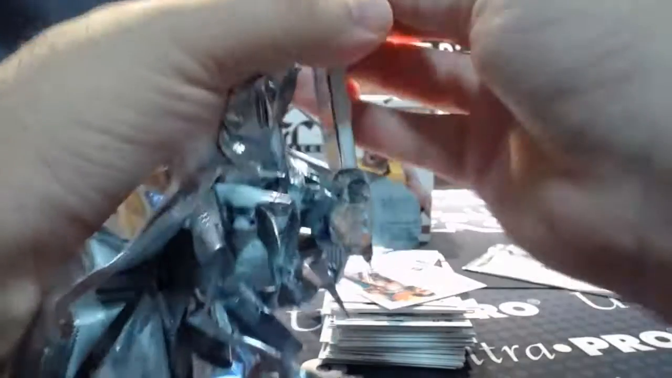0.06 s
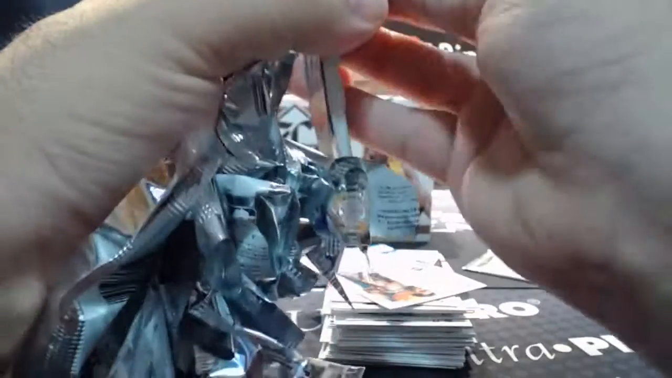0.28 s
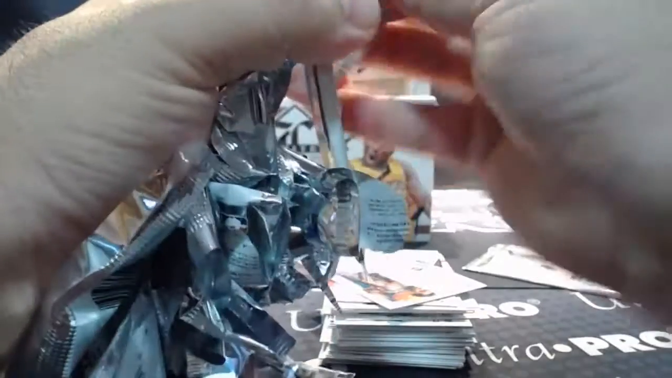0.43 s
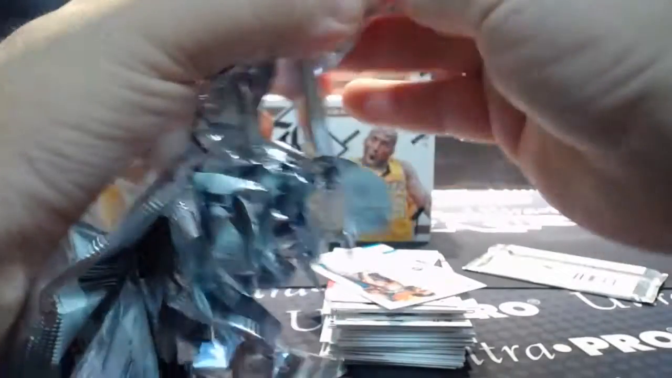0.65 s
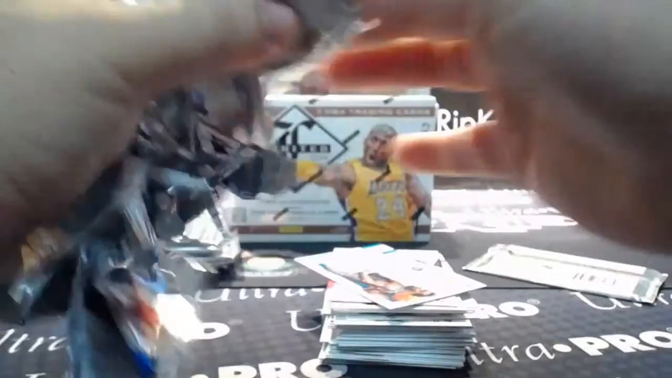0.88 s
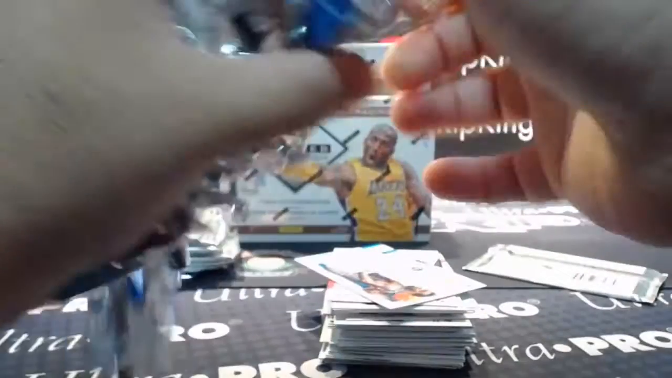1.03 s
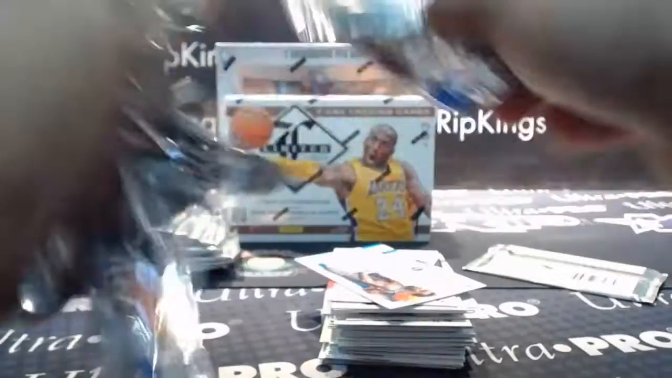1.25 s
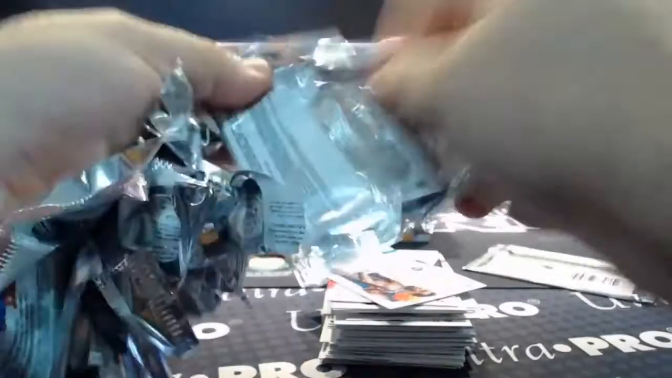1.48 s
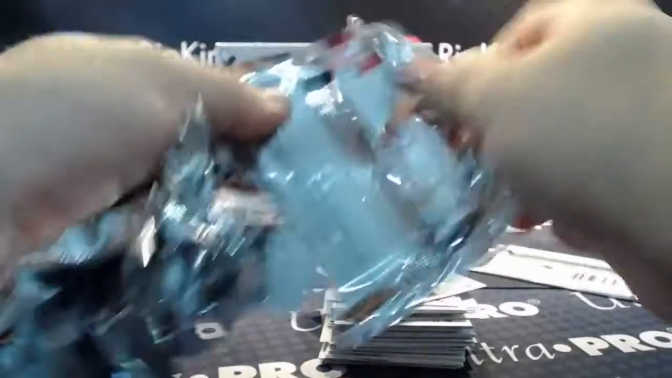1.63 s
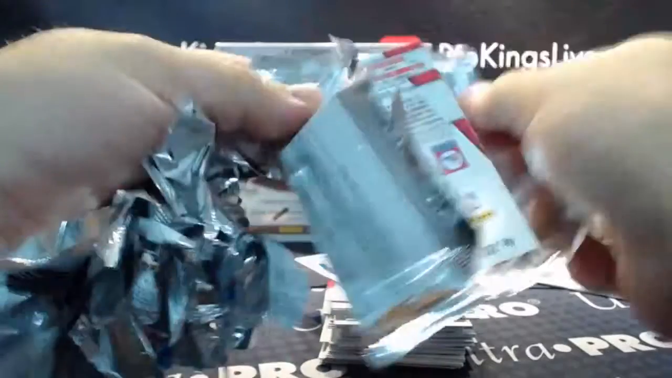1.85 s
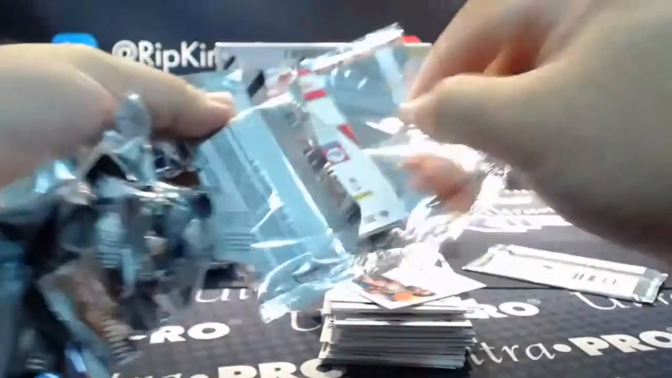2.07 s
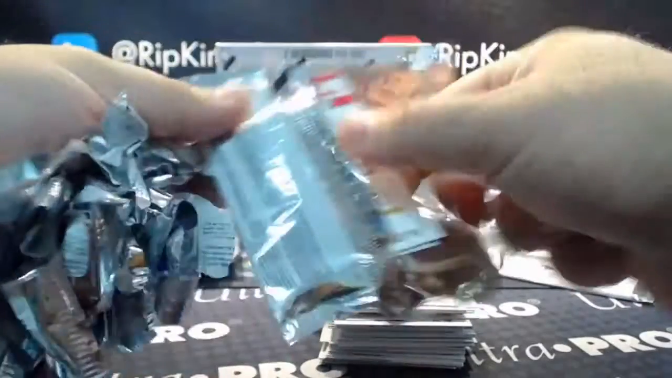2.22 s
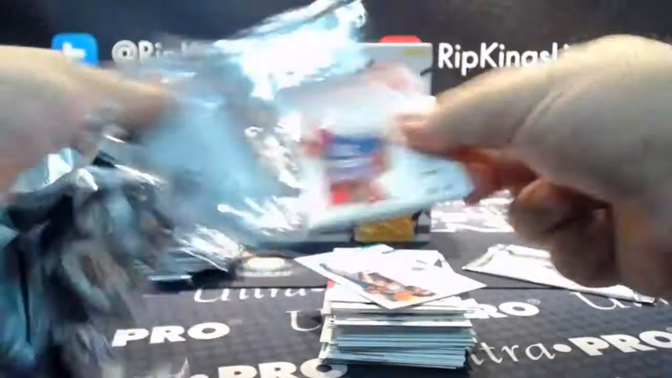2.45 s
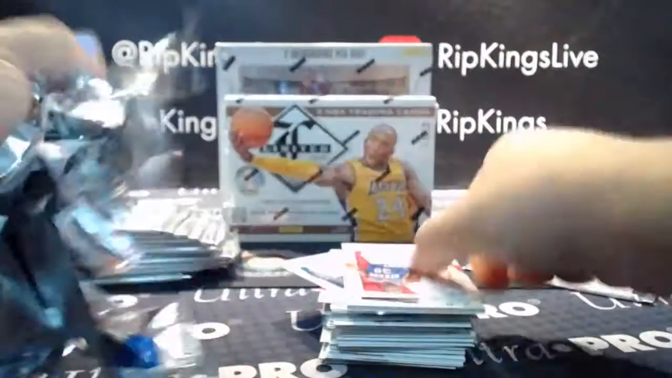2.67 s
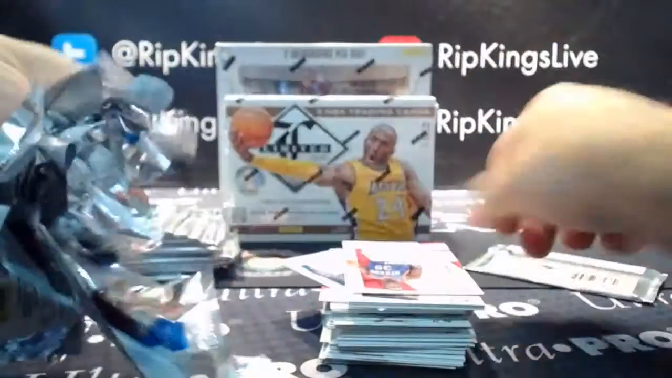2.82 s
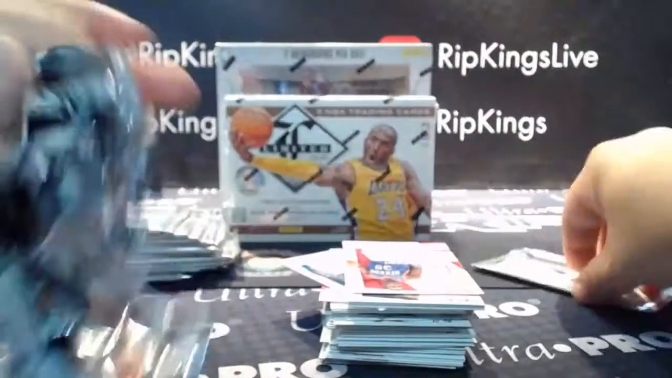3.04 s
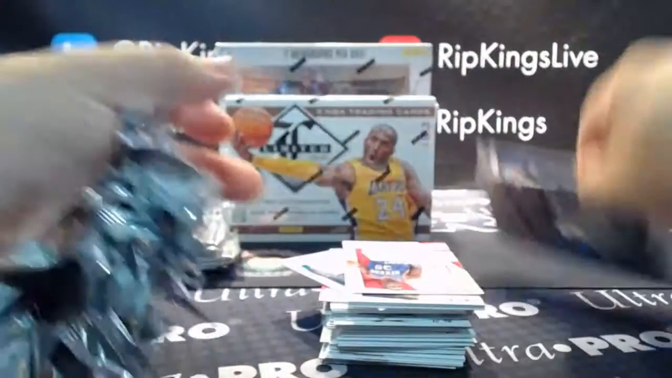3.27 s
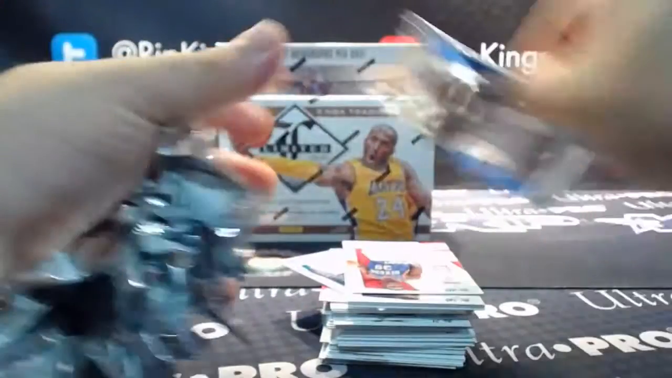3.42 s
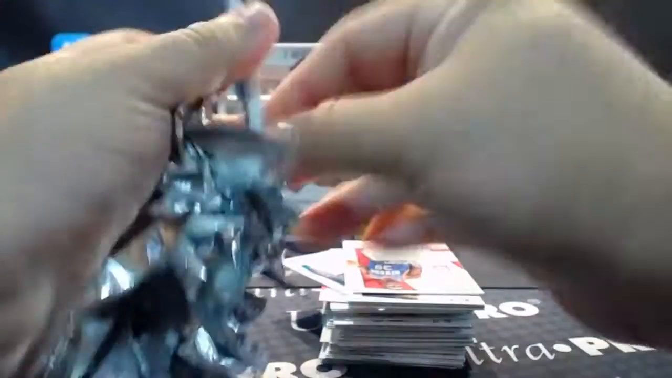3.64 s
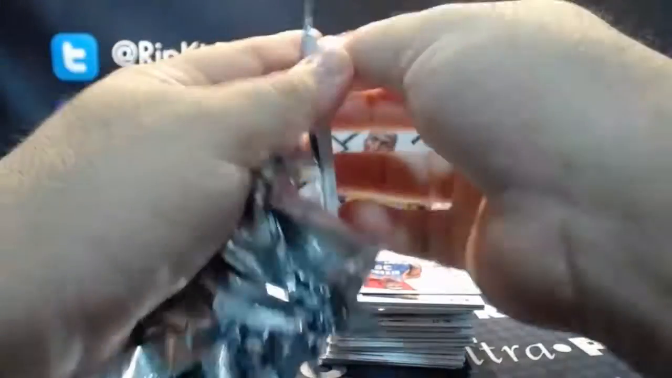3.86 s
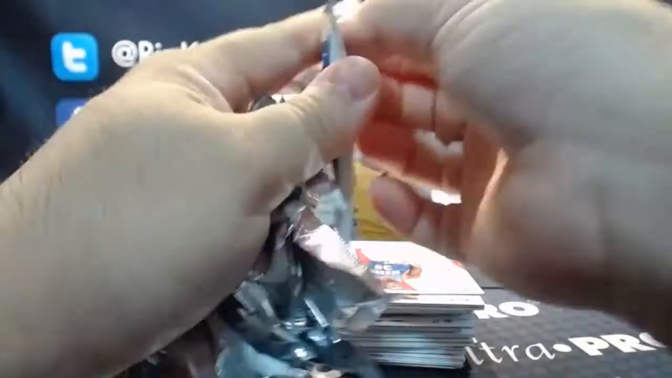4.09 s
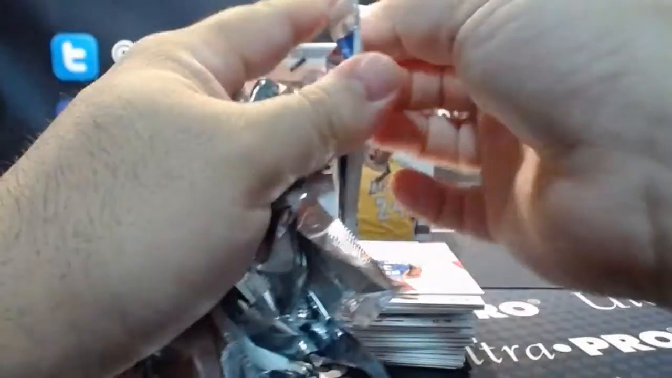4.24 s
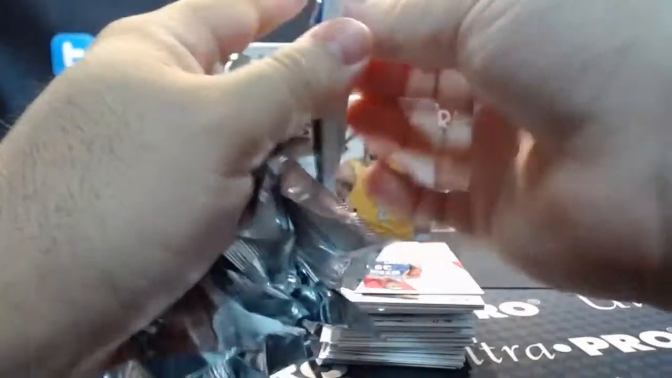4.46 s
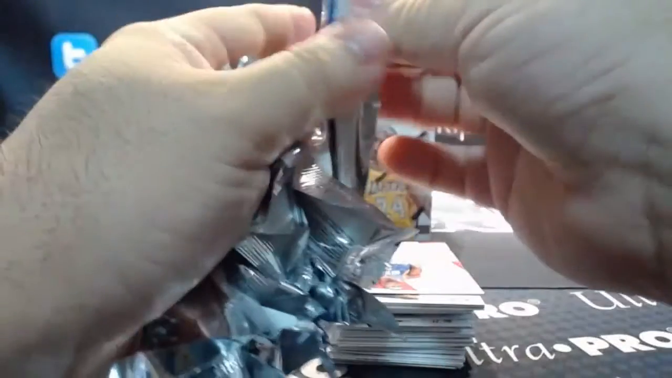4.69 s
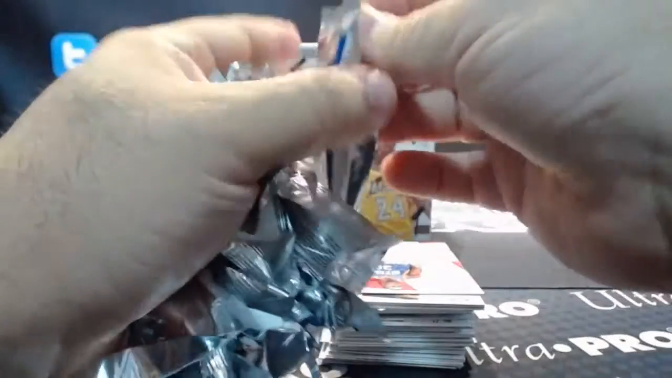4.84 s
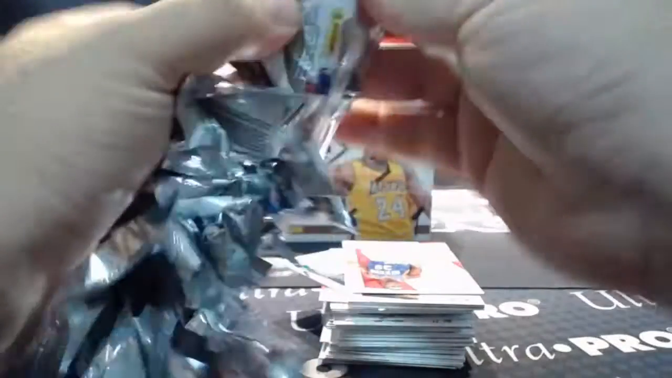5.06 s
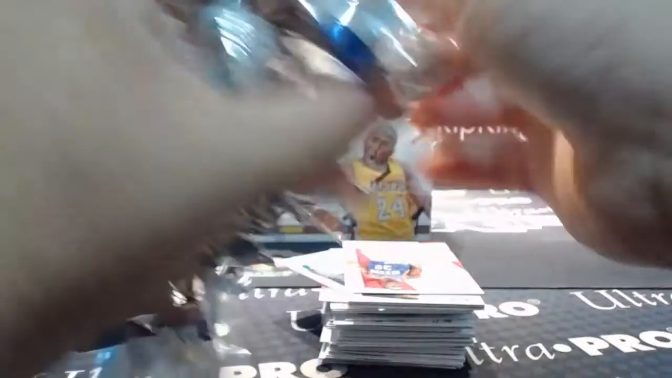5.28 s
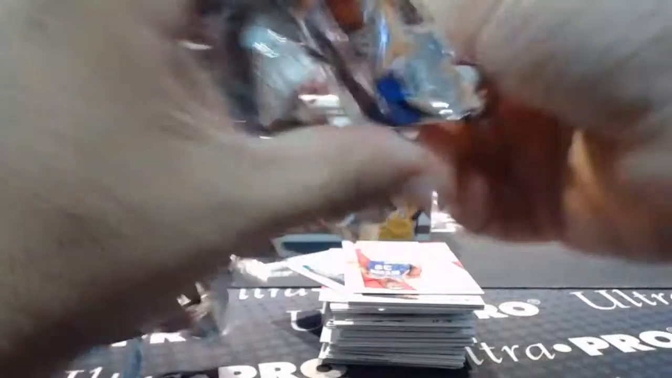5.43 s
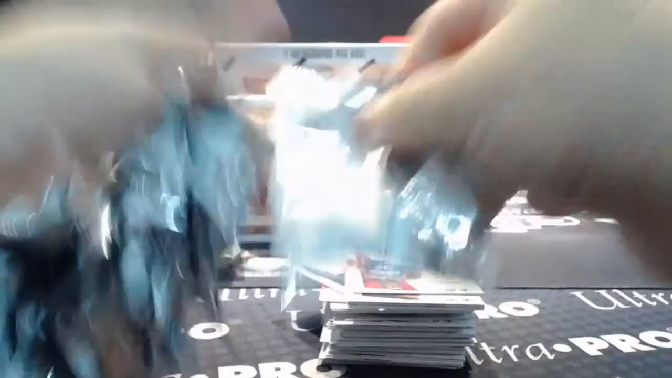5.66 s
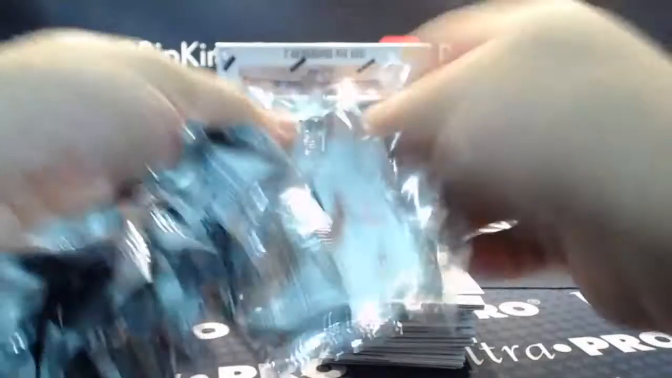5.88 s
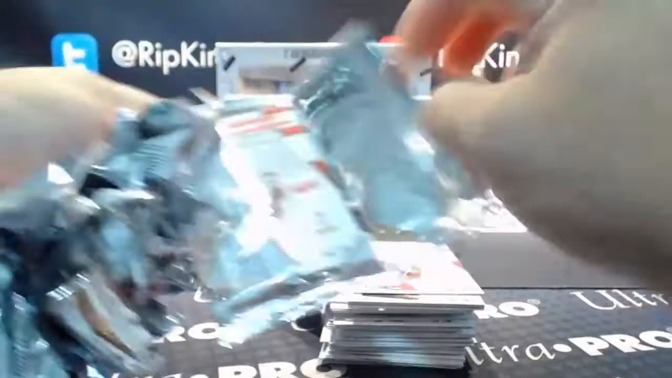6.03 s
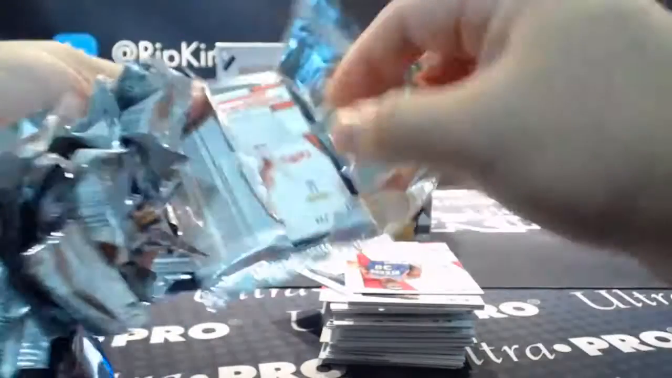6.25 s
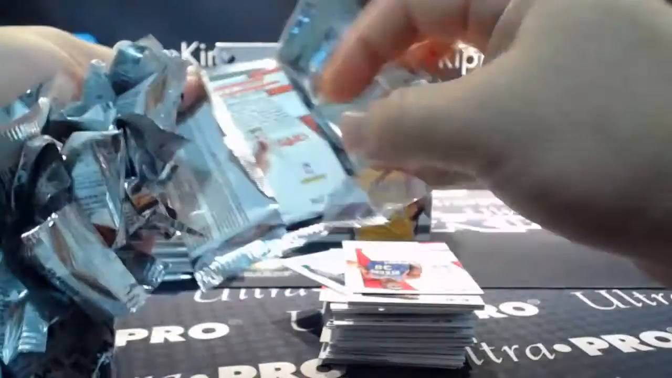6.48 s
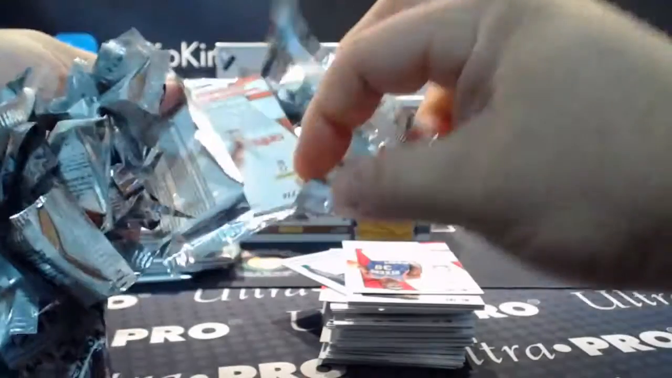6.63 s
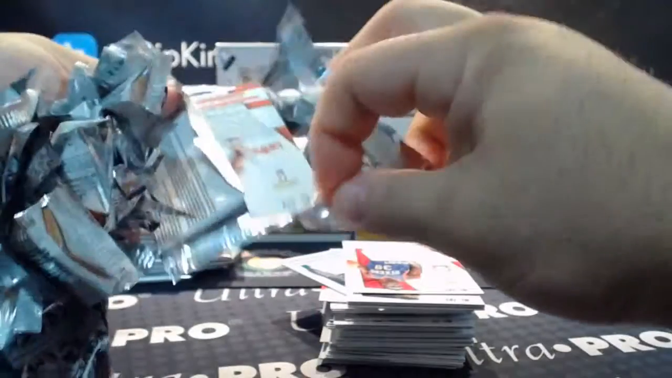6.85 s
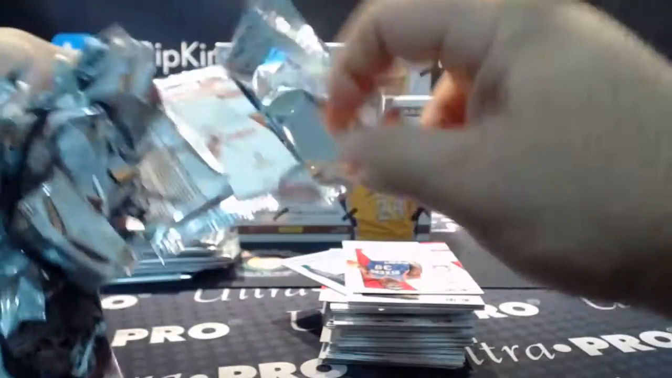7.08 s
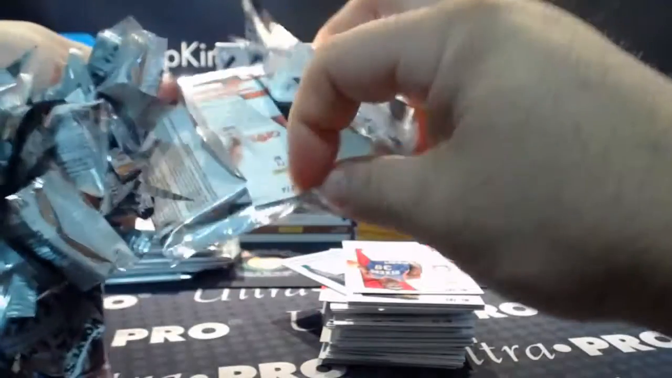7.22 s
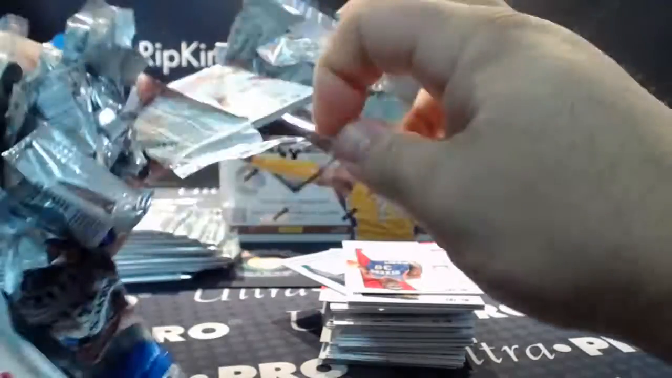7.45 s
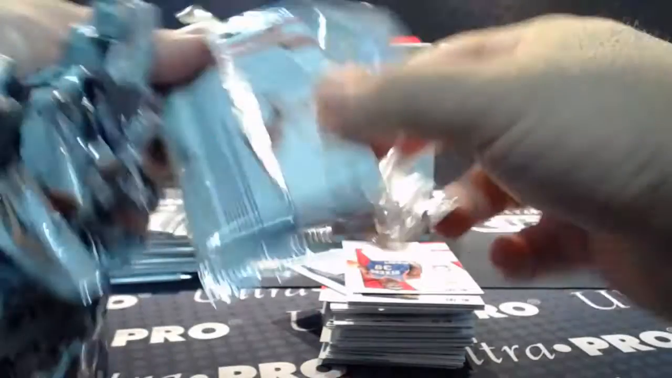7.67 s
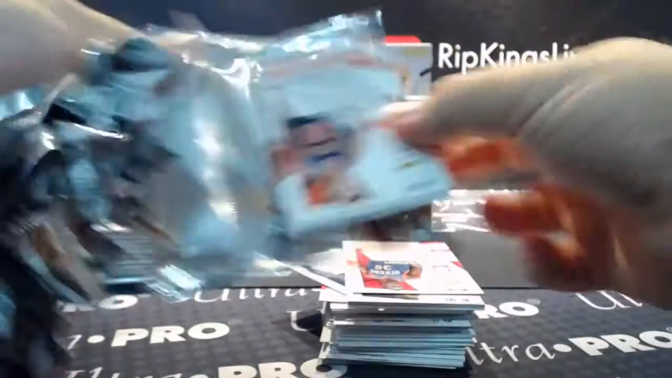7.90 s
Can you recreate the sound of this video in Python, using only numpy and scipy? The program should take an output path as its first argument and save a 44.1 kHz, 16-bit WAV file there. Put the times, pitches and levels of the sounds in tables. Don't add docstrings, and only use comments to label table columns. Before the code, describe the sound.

Two stiff foil packs are opened by hand, one after the other. Irregular crackles build into a rip, ease to light handling, then a very sharp snap starts the second tear, followed by a heavy crunch and sparse rustling. Dull knocks accompany the pulls. Close stereo pickup, quick desk reflection, short indoor tail and low steady hum.

```python
import sys
import numpy as np
from scipy import signal
from scipy.io import wavfile
from scipy.ndimage import uniform_filter1d

SR = 44100
rng = np.random.default_rng(int(sys.argv[2]) if len(sys.argv) > 2 else 0)


def convert_level_to_amplitude(level_db):
    exponent = np.asarray(level_db, float) / 20
    return 10 ** exponent


def to_wav(sig):
    pcm = np.clip(np.atleast_2d(sig), -1, 1) * 32767
    pcm = np.round(pcm).astype(np.int16)
    wavfile.write(sys.argv[1], SR, pcm.T)


N = 348831


def evened(x):
    return x / np.sqrt(np.mean(x ** 2) + 1e-20)


def peaked(x):
    return x / abs(x).max()


def read(points, hz):
    f, value = np.transpose(points)
    return np.interp(np.log(hz + 1), np.log(f + 1), value)


def band(x, lo_hz, hi_hz):
    sos = signal.butter(2, [lo_hz, min(hi_hz, .45 * SR)], "band", fs=SR, output="sos")
    return signal.sosfilt(sos, x)


def coloured(x, points):
    log_gain = np.log(convert_level_to_amplitude(read(points, abs(np.fft.fftfreq(4096, 1 / SR)))))
    minimum_phase = np.exp(np.conj(signal.hilbert(log_gain)))
    taps = np.fft.ifft(minimum_phase).real[:2048]
    return signal.oaconvolve(x, taps[None], axes=1)[:, :N]


def add(mix, s, sound, pan_db, lag):
    for port, side in enumerate((.5, -.5)):
        start = max(round(s * SR + side * lag), 0)
        part = mix[port, start:][:len(sound)]
        part += sound[:len(part)] * convert_level_to_amplitude(side * pan_db)


# start_s, level_db
# (peak), pitch_hz (ring of the facet), low_fold_db, edge_db
SNAPS = [(0.0044, -26.5, 5170, -15, -28), (0.082, -39, 6840, -27, -12), (0.0935, -31, 5000, -30, -8),
         (0.1174, -28, 2200, -27, -5), (0.1463, -28, 4620, -28, -22), (0.1564, -34, 5260, -31, -20),
         (0.2164, -25, 5960, -35, -14), (0.2245, -19.5, 6800, -26.5, -24),
         (0.2834, -33, 6060, -12, -11), (0.3014, -21, 6550, -26, -10), (0.3553, -32.5, 6400, -16, -18),
         (0.4624, -25.5, 2960, -29, -18), (0.471, -19, 6880, -23, -28), (0.5496, -22, 4230, -14, -13),
         (0.5763, -31.5, 7100, -33, 2), (0.603, -21.5, 5500, -30, -14), (0.624, -20, 6230, -19, -24),
         (0.647, -31, 1840, -11, -18), (0.6999, -23.5, 1870, -8, -17), (0.7084, -23.5, 4600, -34, 8),
         (0.7444, -34, 5640, -32, -10), (0.7668, -18.5, 5200, -19, -15),
         (0.7913, -18, 4900, -13.5, -21), (0.7995, -26, 1960, -25, -17), (0.9053, -30, 1830, -31, -32),
         (0.9448, -44, 6050, -27, -7), (0.9673, -44, 6970, -12, -1), (0.994, -22.5, 1920, -8.5, -29),
         (1.0014, -24.5, 4800, -23, -22), (1.027, -33, 6250, -26, 0), (1.0626, -12, 1960, -29, -39),
         (1.0711, -17.5, 4220, -16.5, -21), (1.1049, -23.5, 7460, -15.5, -25),
         (1.1305, -21.5, 5630, -21.5, -6), (1.1934, -35, 1850, -8, -9), (1.2281, -22, 2060, -11.5, -18),
         (1.254, -27, 2020, -30, -14), (1.2712, -16, 2080, -11, 5), (1.3014, -10, 6690, -5.5, -19),
         (1.3952, -24.5, 6800, -25, -6),
         (1.4557, -20, 6100, -32, -7), (1.4675, -20, 3110, -25, -12), (1.5167, -21.5, 1930, -32, 18.5),
             (1.5536, -14.5, 2040, -27, -24), (1.6227, -24, 7160, -17, -11), (1.6712, -21, 4930, -32, -29),
             (1.6939, -25, 4300, -18, -22), (1.7149, -26.5, 4450, -21, -20),
             (1.7769, -21, 2430, -14.5, -17), (1.9067, -26, 4300, -28, -24), (2.0672, -42, 1880, -8, 9),
             (2.1078, -12.5, 3640, -20, -13), (2.1122, -10.5, 1840, -11, -18),
             (2.2767, -30.5, 2580, 2.5, -7), (2.2971, -22, 3060, -23, -17), (2.418, -24, 4000, -7, -22),
             (2.4761, -10.5, 3150, -13, -22), (2.484, -10.5, 2660, -21, -24), (2.4946, -14, 2970, -18, -15),
             (2.5243, -22, 4030, -24, -19), (2.602, -39, 5970, -21, -6), (2.6341, -30, 4160, -18, -17),
             (2.6602, -30.5, 1940, -17, -20), (2.6813, -17, 3780, -15.5, -3), (2.8477, -42, 2780, -10, -8),
             (2.8841, -38, 2940, -8, 13), (2.9415, -35, 3360, -13, 13), (2.9698, -24.5, 2880, -12, -20),
             (3.0113, -26.5, 6750, -16, -17), (3.032, -29.5, 6540, -27, -18), (3.05, -31, 2870, -9.5, -13),
             (3.0699, -19.5, 2560, -10.5, -17), (3.1304, -26, 8800, -31, 2),
             (3.1964, -28.5, 5940, -11.5, -11), (3.2545, -33, 2650, -5, -20), (3.33, -36, 6000, -8, -19),
             (3.3848, -28.5, 3160, -40, -26), (3.5056, -28.5, 2920, -30, -21),
             (3.54, -20.5, 5840, -32, -22), (3.5856, -25, 3030, -21, -20),
         (3.7864, -43.5, 2160, -34, 6), (3.8148, -23.5, 4150, -42, -27), (3.931, -34.5, 2080, 0, -28),
               (3.9933, -26.5, 9500, -42, 13), (4.0528, -44, 1980, -23, -16),
               (4.2325, -16.5, 7800, -30, -18), (4.2422, -17, 4050, -15.5, -16),
               (4.34, -23.5, 6240, -24, -25), (4.3805, -31, 3150, -41, -27), (4.3938, -31, 3870, -36, -19),
               (4.4356, -23, 4300, -37, -23), (4.4475, -26.5, 3200, -11, -23), (4.5009, -24, 5170, -19, 1),
               (4.5116, -26, 5100, -14.5, -16), (4.551, -30, 9130, -12, -12), (4.6077, -32.5, 6400, -19, 8),
               (4.6705, -41.5, 3520, -9, -12), (4.7598, -37.5, 3360, -33, 12.5),
               (4.7896, -14.5, 6900, -29, -19), (4.8374, -27, 5050, -29, -19), (4.843, -32, 4940, -17, -21),
               (4.8532, -30.5, 5000, -17, -22), (4.8594, -36.5, 2970, -20, -17),
               (4.8697, -32, 3300, -18, -13), (4.8822, -15, 4590, -40, -31), (4.9069, -33, 4670, -21, -28),
               (4.9167, -36, 2800, -5, -19), (4.9269, -27, 5150, -16, -25), (4.9366, -32, 2320, -17, -23),
               (4.9736, -37, 4740, -10, -23), (5.0659, -38, 3140, -11, -16), (5.0853, -34, 6450, -27, -19),
               (5.1287, -24, 2930, -30, -14), (5.253, -45, 5180, -5, -17), (5.2844, -31.5, 7170, -27, -25),
               (5.3018, -40.5, 2120, -23, -15), (5.3637, -31, 4770, -32, 0), (5.3952, -0.5, 4480, -15, -12),
               (5.3994, -14.5, 2020, -6, 8), (5.5124, -16.5, 1870, -5.5, -17),
         (5.5405, -5.5, 3850, -14, -17), (5.6545, -26, 5400, -36, 13), (5.684, -29, 2110, -4, 10),
              (5.6972, -20.5, 1690, -9, -18), (5.7134, -21.5, 2000, -11, 8),
              (5.7512, -26.5, 1900, -21, -16), (5.7763, -20.5, 6700, -29, -16),
              (5.7947, -28.5, 3400, -23, -13), (5.805, -32, 3670, -28, -8), (5.8682, -21.5, 3300, -19, 1),
              (5.8819, -24, 1920, -21, 9), (5.8907, -19, 3470, -36, -19), (5.9752, -29, 4180, -6, -14),
              (6.0347, -34, 2600, -32, -13), (6.0545, -22.5, 3250, -28, -9), (6.136, -31, 7800, -6, -12),
              (6.1605, -15, 3040, -13, -15), (6.1908, -7, 6640, -37, -15), (6.2149, -10, 3030, -10.5, 0),
              (6.2477, -15, 1890, -3, 8), (6.3297, -37, 1870, -7, -19), (6.3629, -35, 1950, -10, -18),
              (6.4055, -43, 8530, -19, -14), (6.4303, -20, 4160, -17, -22), (6.4582, -30.5, 2460, -12, -17),
              (6.6619, -43, 3060, -17.5, -8), (6.787, -32, 8050, -9.5, -21), (6.835, -38, 7160, -13, -10.5),
              (6.8611, -28.5, 2030, -14, -35), (7.0512, -32.5, 3470, -18, 3), (7.0734, -51, 1880, -0.5, 5),
              (7.1863, -36.5, 1950, -34, -15), (7.226, -25.5, 4300, -32, -17),
              (7.2786, -32, 1940, -4, -0.5), (7.5601, -30.5, 7570, -28, -16.5),
              (7.5926, -25, 5270, -18, -27), (7.7034, -29.5, 6900, -22, -2), (7.739, -42, 1890, -9, 16),
              (7.7782, -22, 4100, -22, 9), (7.8178, -24.5, 4220, -7, -16)]


def creases():
    return np.array(SNAPS)


def snaps():
    rise_s, crack_s, ring_cycles = .0012, .0008, 2.4
    out = np.zeros((2, N))
    t = np.arange(700) / SR
    onset = 1 - np.exp(-t / rise_s)
    for s, db, hz, low_db, edge_db in creases():
        crack = rng.standard_normal(len(t)) * np.exp(-t / crack_s) * onset
        ring = np.sin(2 * np.pi * hz * t) * np.exp(-t * hz / ring_cycles) * onset
        facet = peaked(ring)
        facet = facet + 0.65 * peaked(band(crack, 0.81 * hz, 2.06 * hz))
        facet = facet + 0.81 * peaked(band(crack, 1500, 10000))
        fold = peaked(band(crack, 710, 1250))
        edge = peaked(band(crack, 5600, 13000))
        snap = peaked(facet) + convert_level_to_amplitude(low_db - 1.5) * fold + convert_level_to_amplitude(edge_db - 9.0) * edge
        add(out, s + .0001, convert_level_to_amplitude(db + 4.5) * snap, rng.normal(1.3, 3.5), rng.normal(0, 1.6))
    return band(out, 300, 11500)


def aftershocks():
    settle_db, settle_s = -23.5, 0.012
    s, db = creases().T[:2]
    kicks = np.zeros(N)
    np.add.at(kicks, np.round(s * SR).astype(int), convert_level_to_amplitude(db + settle_db))
    return signal.lfilter([1], [1, -np.exp(-1 / (settle_s * SR))], kicks)


# peak_s, effort_db, rise_s, fall_s,
# large_folds_db
PULLS = [(0.12, -27, 0.048, 0.039, -27), (0.485, -31.5, 0.063, 0.28, -34),
         (.637, -36.5, 0.046, 0.022, -22), (0.708, -33.5, 0.012, 0.18, -20),
         (1.071, -51, 0.025, 0.66, -10.5), (1.306, -18.5, 0.11, 0.081, -36),
         (1.329, -18.5, 0.056, 0.067, 2), (1.519, -24, 0.16, 0.16, -36), (1.685, -54, 0.4, 0.31, 4),
         (1.786, -34, 0.027, 0.13, -9), (1.913, -40, 0.064, 0.17, -2), (2.121, -12, 0.028, 0.08, -19),
         (2.135, -22, 0.03, 0.044, -29), (2.162, -13.5, 0.087, 0.039, -20),
         (2.189, -24.5, 0.054, 0.11, -2.5), (2.305, -22.5, 0.059, 0.051, -5),
         (2.422, -37.5, 0.094, 0.14, 19), (2.487, -32, 0.015, 0.13, 5), (2.681, -39, 0.21, 0.07, 6.5),
         (2.91, -43, 0.19, 0.77, 1), (3.073, -32.5, 0.086, 0.052, 24), (3.342, -36, 0.32, 0.26, -43),
         (3.51, -37.5, 0.076, 0.1, -36), (3.56, -37.5, 0.14, 0.017, -30),
         (3.6, -28, 0.026, 0.084, -35),
         (4.055, -42, 0.028, 0.0574, -17), (4.214, -48.5, 0.19, 0.111, 8),
                (4.46, -46.5, 0.28, 0.52, -8), (4.798, -42, 0.072, 0.2, -31.5),
                (5.404, -18, 0.022, 0.19, 6.5), (5.546, -19, 0.098, 0.07, 11),
                (5.601, -21.5, 0.094, 0.055, 5.5), (5.706, -28, 0.037, 0.1, 12),
                (5.796, -35.5, 0.18, 0.04, -7.5), (5.89, -30, 0.048, 0.043, -4),
                (6.065, -37, 0.3, 0.096, -9.5), (6.198, -13.5, 0.03, 0.024, -36.5),
                (6.219, -16, 0.026, 0.046, -12), (6.236, -26.5, 0.021, .03, -3),
                (6.256, -14.5, 0.016, 0.039, 17.5), (6.17, -33.5, 0.18, 0.17, 8),
                (6.35, -43, 0.34, 0.33, 10), (6.459, -32.5, 0.076, 0.076, 0), (6.798, -51, 0.043, 0.2, 3),
                (7.07, -58, 0.33, .2, 14.5), (7.25, -41.5, 0.079, 0.183, -15),
                (7.596, -40, 0.0395, 0.096, 4), (7.779, -38.5, 0.089, 0.15, -27)]
SHIFTS = [(.215, -54, 0.15, 0.13, -32), (.33, -51.5, 0.44, 0.5, 12), (.96, -59.5, 0.42, 0.46, -10),
          (2.02, -63.5, 0.3, 0.096, -10), (3.19, -50.5, 0.37, 0.68, -2), (3.781, -52, 0.72, 1, -20),
          (5.05, -49.5, 0.215, 0.063, 10), (5.299, -46.5, 0.46, 0.6, -5), (5.978, -42, 0.061, 0.21, -7.5),
          (6.56, -47, 0.1, 0.067, -1.5), (6.66, -61, 0.14, 0.13, -12.5), (7.165, -47, 0.094, 0.074, -13.5),
          (7.391, -53.5, 0.1, 0.16, 8.5), (7.68, -51.5, 0.19, 0.07, -8)]


def handling():
    swing_db = 30
    t = np.arange(0, N, 32) / SR
    rows = np.transpose(PULLS + SHIFTS)
    s, db, rise_s, fall_s, folds_db = rows[:, :, None]
    before = (s - t) / np.maximum(rise_s, .005)
    after = (t - s) / np.maximum(fall_s, .005)
    pulls = convert_level_to_amplitude(db - swing_db * np.maximum(before, after))
    grip = convert_level_to_amplitude(-68)
    effort = grip + pulls.sum(0)
    folds = (grip * convert_level_to_amplitude(4.7 * -7.5) + (pulls * convert_level_to_amplitude(0.28 * folds_db)).sum(0)) / effort
    return [np.interp(np.arange(N) / SR, t, v) for v in (effort, folds)]


def buckle(hz, noise):
    ring_s, crack_s, ring_share = 5.6 / hz, .001, 0.38
    t = np.arange(len(noise)) / SR
    ring = np.sin(2 * np.pi * hz * t) * np.exp(-t / ring_s) * (1 - np.exp(-t / 0.00057))
    crack = noise * np.exp(-t / crack_s) * (1 - np.exp(-t / 0.000082))
    ring = ring / np.linalg.norm(ring)
    crack = crack / np.linalg.norm(crack)
    return ring_share * ring + (1 - ring_share) * crack


def crackle_swarm(effort):
    sizes = 36
    clumps = evened(uniform_filter1d(uniform_filter1d(rng.standard_normal(N), 250), 250))
    per_s = 560 * (effort / convert_level_to_amplitude(-44.5)) ** 0.32 * convert_level_to_amplitude(5.4 * clumps)
    strength = convert_level_to_amplitude(3.2 * np.minimum(rng.exponential(1, N), 5))
    clicks = (rng.random(N) < per_s / SR) * strength

    drift = evened(uniform_filter1d(uniform_filter1d(rng.standard_normal(N), 1500), 1500))
    size = abs(np.round(22 + 7.0 * drift + 7.0 * rng.standard_normal(N)))
    size = np.where(size < sizes, size, 2 * sizes - 1 - size)

    shared = rng.standard_normal(N)
    wide = band(rng.standard_normal((2, N)), 800, 21000)
    out = .065 * (shared + 1.52 * wide) * convert_level_to_amplitude(3.2 * clumps)

    for k, hz in enumerate(np.geomspace(420, 11000, sizes)):
        noise = rng.standard_normal(400)
        tinted = evened(band(noise, 0.37 * hz, 1.98 * hz)) + 1.2 * noise
        train = signal.oaconvolve(clicks * (size == k), buckle(hz, tinted))[:N]
        add(out, 0, train, rng.normal(0.35, 0.28), rng.normal(0, 1.9))
    return out


def refolded(x):
    z = signal.stft(x, nperseg=256)[2]
    patches = uniform_filter1d(rng.standard_normal(z.shape[1:]), size=5, axis=0)
    patches = uniform_filter1d(patches, size=10, axis=1)
    patchy_db = 2.8
    return signal.istft(z * convert_level_to_amplitude(patchy_db * evened(patches)), nperseg=256)[1][:, :N]


EDGES_HZ = (150, 1400, 5500, 17000)


def crumple():
    pull, folds = handling()
    effort = convert_level_to_amplitude(-2.5) * pull + aftershocks()
    crackle = refolded(crackle_swarm(effort))
    low, body, top = (band(crackle, lo, hi) for lo, hi in zip(EDGES_HZ, EDGES_HZ[1:]))
    power = ((top - body) ** 2 + low ** 2).mean(0)
    steady = np.sqrt(uniform_filter1d(power, size=900) + 0.054 * power.mean())
    wrinkles = convert_level_to_amplitude(-4) * (pull / convert_level_to_amplitude(-50.5)) ** 0.2027
    return effort * (convert_level_to_amplitude(7.0) * folds * low - body + wrinkles * top) / steady


# pitch_hz, level_db
FOIL_COLOUR = [(150, -23.5), (360, 0), (550, -12), (940, 0.74), (1370, -10.5), (1850, -2.5), (2380, -4),
               (2800, 0), (4000, -0.5), (6600, 3), (11800, -5), (16000, -23)]


def foil_on_desk():
    extra_path_s, desk_share = 0.00094, 0.15
    foil = coloured(crumple(), FOIL_COLOUR) + snaps()
    late = round(extra_path_s * SR)
    echo = np.pad(band(foil, 240, 2700), ((0, 0), (late, 0)))[:, :N]
    return foil + desk_share * echo


# start_s, level_db (peak), pitch_hz, ring_cycles
KNOCKS = [(1.619, -38, 490, 2.2), (2.115, -34.5, 332, 2), (2.164, -23.5, 368, 3.2), (2.297, -30, 345, 1.7),
          (2.32, -34, 365, 1.7), (2.416, -35, 216, 1.8), (2.474, -27, 307, 1.3), (2.474, -22, 900, 3.1),
          (2.492, -32, 346, 2.3), (2.514, -30, 810, 3.5), (2.96, -41, 209, 1.4), (3.932, -29.5, 283, 1.5),
          (4.446, -38, 820, 3.5), (5.398, -26.5, 484, 2.2), (5.431, -28, 900, 2.5), (5.682, -31, 920, 2.8),
          (5.703, -24.5, 437, 0.88), (5.716, -23, 378, 1.1), (5.75, -32, 440, 1.6), (5.867, -39, 473, 1.2),
          (5.881, -32, 447, 0.77), (5.967, -39, 440, 2.7), (6.233, -23, 950, 1.7), (6.252, -17, 366, 1.8),
          (6.268, -26.5, 368, 1.9), (6.357, -43, 367, 3.9), (6.455, -40.5, 218, 1.6), (6.788, -37, 366, 2),
          (7.766, -46.5, 278, 1.75)]
BUMPS = [
    (2.165, -48, 90, 1.2),
    (2.299, -49, 110, 1.5),
    (2.475, -46, 100, 1),
    (2.998, -52, 170, 1.5),
    (3.236, -38.5, 89, 0.93),
    (3.498, -50, 51.6, 1.3),
    (3.55, -60, 150, 1.5),
    (6.191, -46.5, 130, 1.7),
    (6.253, -26, 125, 0.6),
]


def knocks():
    out = np.zeros((2, N))
    t = np.arange(4000) / SR
    for s, db, hz, cycles in np.vstack([KNOCKS, BUMPS]):
        fade = np.exp(-t * hz / max(cycles, .5)) * (1 - np.exp(-t * hz / 0.44))
        scuff = evened(band(rng.standard_normal(len(t)), .5 * hz, 1.58 * hz)) * np.sqrt(fade)
        knock = peaked(np.sin(2 * np.pi * hz * t) * fade + 0.33 * scuff)
        add(out, s, convert_level_to_amplitude(db + 1.5) * knock, rng.normal(.8, 1.3), rng.normal(0, 2.4))
    return band(out, 40, 3000)


# pitch_hz, decay_s
ROOM_DECAY = [(300, .16), (1300, .11), (4000, .09), (10000, .07)]


def room(x):
    taps = np.zeros((2, SR // 2))
    starts = np.arange(120, SR // 2 - 20, 20)
    at = starts + rng.integers(0, 20, (2, len(starts)))
    np.put_along_axis(taps, at, rng.choice([-1., 1.], at.shape), 1)
    hz, t, (mid, side) = signal.stft(taps, SR, nperseg=256)
    side = side * (hz / (hz + 500))[:, None]
    fade = convert_level_to_amplitude(-60 * t / read(ROOM_DECAY, hz)[:, None])
    tail = signal.istft(np.array([mid + side, mid - side]) * fade, SR, nperseg=256)[1]
    return signal.fftconvolve(x, tail / np.linalg.norm(tail[0]), axes=1)[:, :N]


# pitch_hz, level_db (per Hz)
AIR_COLOUR = [(18, -41), (30, -11), (75, -7.5), (157, -3.5), (400, -7.5), (700, -23), (1540, -24.5),
              (16000, -56)]
# pitch_hz, level_db (rms)
HUM_LINES = [(119, -69.5), (240, -73.5), (360, -75.5), (475, -76.5)]


def background():
    same, other = rng.standard_normal((2, N))
    opposite = np.array([other, -other])
    air = np.array([same, same]) + .2 * opposite + 1.7 * band(opposite, 2000, 16000)
    air = convert_level_to_amplitude(-62.5) * evened(coloured(air, AIR_COLOUR))
    waver = evened(uniform_filter1d(rng.standard_normal((len(HUM_LINES), N)), 9000))
    t = np.arange(N) / SR
    hum = np.zeros(N)
    for (hz, db), w in zip(HUM_LINES, waver):
        phase = 2 * np.pi * hz * t + np.roll(w, 20000)
        hum += convert_level_to_amplitude(db + 5.0 + 2.5 * w) * np.sin(phase)
    return air + hum


def scene():
    near = foil_on_desk() + knocks()
    return near + convert_level_to_amplitude(-13) * room(near) + background()


def low_pass(x):
    return signal.sosfilt(signal.butter(12, 16810, fs=SR, output="sos"), x)


def record(dry):
    ceiling, top_hz = .7, 16300
    rounded = ceiling * np.tanh(dry / ceiling)
    edge = signal.firwin(255, top_hz, fs=SR)
    mix = signal.oaconvolve(rounded, edge[None], "same")
    return low_pass(mix)


dry = scene()
out = record(dry)
to_wav(out)
```